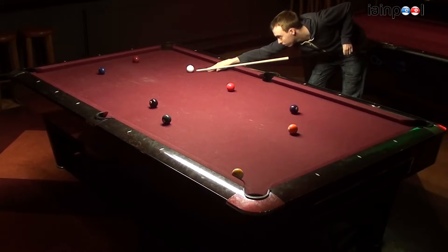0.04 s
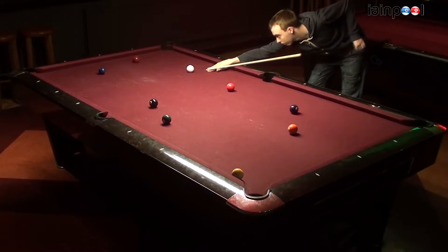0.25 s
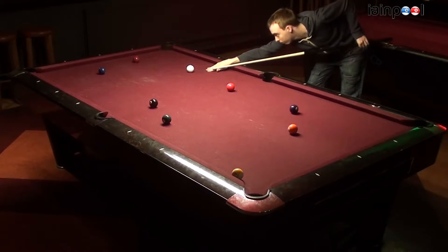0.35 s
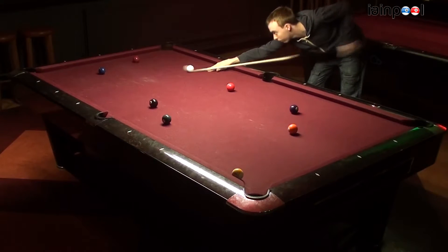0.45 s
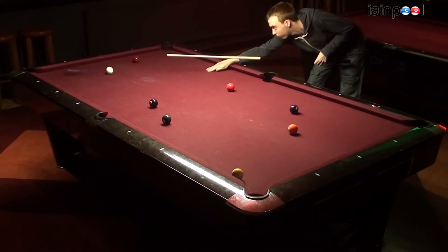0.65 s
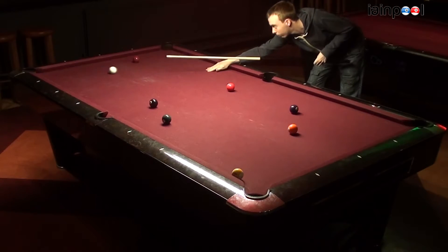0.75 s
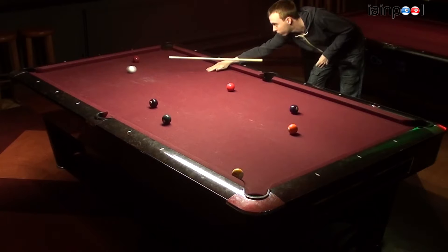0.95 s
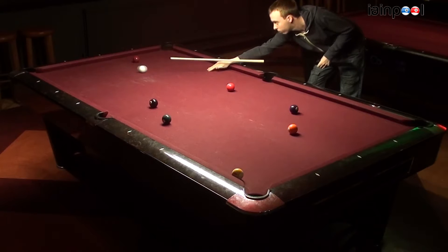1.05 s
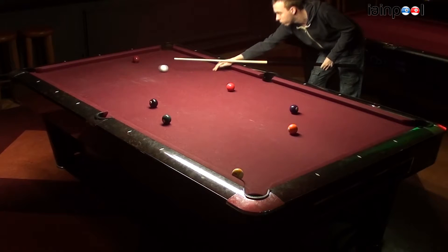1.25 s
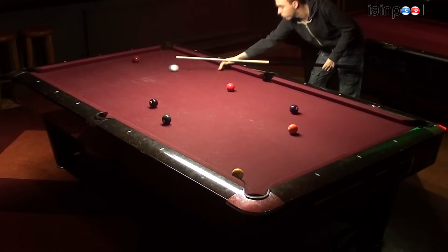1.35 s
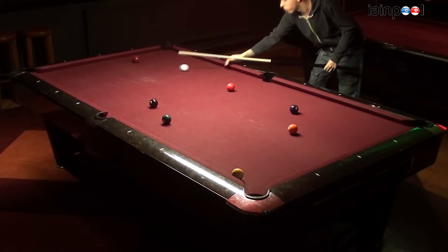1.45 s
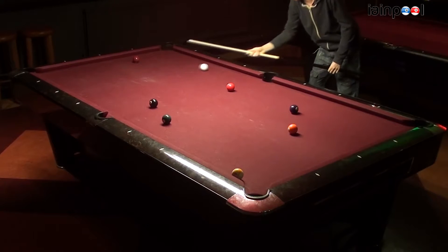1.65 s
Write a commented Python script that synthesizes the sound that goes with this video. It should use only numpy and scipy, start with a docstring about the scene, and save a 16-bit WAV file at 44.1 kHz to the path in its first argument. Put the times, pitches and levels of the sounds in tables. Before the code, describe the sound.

A pool shot in a quiet, hard-walled hall. After a few dull thumps, the cue cracks against the white, two balls click sharply, and one clatters into a pocket and rolls on under the table, heard from a little distance.

```python
"""A quiet, hard-walled hall: one pool shot. A soft knock and dull thumps come first; the cue cracks
against the white, which clicks on an object ball; that ball clatters into a pocket and knocks again
as it rolls on below. Each blow is a coloured click, heard mostly through the room; the table's frame
and the pocket also ring. A fast gain control holds the loud blows down."""
import sys
import numpy as np
from scipy import signal
from scipy.fft import rfft, irfft, next_fast_len
from scipy.io import wavfile
from scipy.ndimage import uniform_filter1d

SR = 44100
rng = np.random.default_rng(int(sys.argv[2]) if len(sys.argv) > 2 else 0)


def put_to_file(sound):
    """Save the sound as 16-bit audio at rate SR, in the file named by the first command-line argument."""
    columns = np.atleast_2d(sound).T  # one column per channel
    safe = np.clip(columns, -1, 1)
    whole_steps = np.round(safe * 32767)
    wavfile.write(sys.argv[1], SR, whole_steps.astype(np.int16))


N = 74970
T = np.arange(N) / SR
FFT_SIZE = next_fast_len(2 * N)
FREQS_HZ = np.maximum(np.arange(FFT_SIZE // 2 + 1) * SR / FFT_SIZE, 1)


def from_db(db):
    """Decibels to gain."""
    return 10 ** (np.asarray(db) / 20)


def unit(x):
    """Scale to unit energy."""
    return x / np.sqrt(np.sum(x ** 2) + 1e-20)


def pan(db):
    """Left and right gains for a left-minus-right level."""
    return from_db(db * np.array([[.5], [-.5]]))


def at_freqs(points):
    """Read (Hz, value) rows on a log-frequency axis."""
    hz, value = np.transpose(points)
    return np.interp(np.log(FREQS_HZ), np.log(hz), value)


def filtered(x, response):
    """Apply a frequency response."""
    return irfft(rfft(x, FFT_SIZE) * response, FFT_SIZE)[..., :N]


def stereo(mid, side, side_db=0):
    """Left and right from a middle and a weaker side, widest in the treble."""
    # Each row: frequency in Hz, side gain in dB before side_db is added.
    width = [(150, -38), (350, -20.5), (700, -14.5), (1500, -12), (4500, -10), (9000, -13.5), (12000, -47)]
    return mid + filtered(side, from_db(at_freqs(width) + side_db)) * np.array([[1], [-1]])


def noise(colour, side_db):
    """Steady coloured stereo noise, rms about 1."""
    white = rfft(rng.standard_normal((2, FFT_SIZE)))
    mid, side = irfft(white * from_db(at_freqs(colour)), FFT_SIZE)[:, :N]
    return stereo(unit(mid), unit(side), side_db) * np.sqrt(N)


def causal_click(colour):
    """Minimum-phase click of a given colour: it rings only after it starts."""
    cepstrum = irfft(np.log(from_db(at_freqs(colour))), FFT_SIZE)
    cepstrum[1:FFT_SIZE // 2] *= 2
    cepstrum[FFT_SIZE // 2 + 1:] = 0
    return unit(irfft(np.exp(rfft(cepstrum)), FFT_SIZE)[:N])


def hall_response():
    """Early reflections plus a diffuse tail that swells and dies band by band, the bass coming late."""
    # Each row: frequency in Hz, T60 in seconds.
    decays = [(80, 0.68), (200, 0.72), (550, 0.61), (1200, 0.55), (2200, 0.39), (7000, 0.37), (15000, 0.3)]
    build_cycles = 1.66
    echoes_per_s, echo_fade_s, echo_db = 770, 0.039, -6
    hz, t60s = np.transpose(decays)
    white = rfft(rng.standard_normal((2, N)))
    log_hz = np.log(np.maximum(np.arange(white.shape[1]) * SR / N, 1))
    tail = 0
    for weights, centre_hz, t60_s in zip(np.eye(len(hz)), hz, t60s):
        band = irfft(white * np.interp(log_hz, np.log(hz), weights), N)
        swell = 1 - np.exp(-T * centre_hz / build_cycles)
        tail = tail + band * swell * from_db(-60 * T / t60_s)
    arrivals = rng.random((2, N)) < echoes_per_s / SR
    echoes = arrivals * rng.choice([-1, 1], (2, N)) * np.exp(-T / echo_fade_s)
    echoes = signal.sosfilt(signal.butter(1, 250, "high", fs=SR, output="sos"), echoes)
    mid, side = [unit(unit(late) + from_db(echo_db) * unit(early)) for late, early in zip(tail, echoes)]
    return stereo(mid, side)


def direct_path(scatter_s=0.0041, scatter_db=2):
    """One arrival plus a short burst scattered by balls and rails."""
    burst = unit(rng.standard_normal(N) * np.exp(-T / scatter_s))
    return unit((T == 0) + from_db(scatter_db) * burst)


def blows(contacts, colour, direct_db, level_db=0):
    """Clicks coloured by the struck body, softened by the contact's cut-off, spread by the hall."""
    # Reflections are duller than direct sound. Each row: frequency in Hz, gain in dB.
    wall_loss = [(3000, -1.5), (8000, -2), (14000, -5)]
    wall_gain = from_db(at_freqs(wall_loss))
    body = causal_click(colour)[:N // 16]
    out = np.zeros((2, N))
    for start_s, strength_db, cutoff_hz in contacts:
        click = unit(signal.sosfilt(signal.butter(2, cutoff_hz, fs=SR, output="sos"), body))
        direct = from_db(direct_db) * rfft(direct_path(), FFT_SIZE)
        reflected = wall_gain * rfft(hall_response(), FFT_SIZE)
        heard = filtered(click, direct + reflected)
        start = int(start_s * SR)
        out[:, start:] += from_db(level_db + strength_db) * heard[:, :N - start]
    return out


def ringing(contacts, modes, level_db):
    """Each blow rings the modes at slightly varied level and pitch; soft contacts miss the high ones."""
    spread_db, detune = 2, 0.0063
    out = np.zeros(N)
    for start_s, strength_db, cutoff_hz in contacts:
        start = int(start_s * SR)
        t = T[:N - start]
        for hz, mode_db, t60_s in modes:
            level_draw, pitch_draw = rng.standard_normal(2)
            onset_db = level_db + strength_db + mode_db + spread_db * level_draw
            swell = 1 - np.exp(-t * hz)  # about one cycle
            contact_gain = 1 / np.hypot(1, (hz / cutoff_hz) ** 2)
            tone = np.sin(2 * np.pi * hz * (1 + detune * pitch_draw) * t)
            out[start:] += contact_gain * swell * from_db(onset_db - 60 * t / t60_s) * tone
    return out


def room_floor(level_db=-44.5):
    """The hall's steady, low background noise."""
    # Each row: frequency in Hz, relative level in dB.
    colour = [(20, -31), (60, 4.5), (150, 1.5), (250, -18), (350, 7.5), (480, -7.5), (650, -8), (1100, -8),
              (2000, -26), (4500, -33), (9000, -35.5)]
    return from_db(level_db) * noise(colour, side_db=2)


def amplifier_hiss(level_db=-56.5):
    """The amplifier's faint, steady hiss."""
    # Each row: frequency in Hz, relative level in dB.
    colour = [(1000, 4), (4500, 5.5), (9000, 1.7), (16000, -3.5)]
    return from_db(level_db) * noise(colour, side_db=4)


def rolling():
    """Balls rumble on the slate and inside the table."""
    # Each row: time in seconds, level in dB.
    levels = [(0, -83), (.18, -48.5), (.45, -46.5), (.57, -26), (.8, -24), (1.0, -29), (1.2, -37),
              (1.45, -44), (1.7, -47)]
    # Each row: frequency in Hz, relative level in dB.
    colour = [(25, -16), (60, -13), (110, 4.5), (200, 4.5), (340, 5), (440, -2), (560, 14), (800, -3),
              (1200, -19.5), (2500, -9), (6000, -82)]
    return from_db(np.interp(T, *np.transpose(levels))) * noise(colour, side_db=-2)


def shaft_slide():
    """The cue hisses over the bridge hand, swelling and fading with each move."""
    # Each row: start in seconds, attack in seconds, decay in seconds, level in dB.
    slides = [(0.375, 0.011, 0.017, -42), (.40, 0.024, 0.29, -48.5), (1.367, 0.025, 0.14, -45.5),
              (1.40, 0.054, 0.12, -52)]
    # Each row: frequency in Hz, relative level in dB.
    colour = [(500, 5.5), (1700, 5.5), (3000, -1.5), (4500, -3), (7000, -2), (10000, -14), (16000, -30)]
    envelope = np.zeros(N)
    for start_s, attack_s, decay_s, level_db in slides:
        rise = np.clip((T - start_s) / attack_s, 0, 1)
        fall = np.exp(-np.maximum(T - start_s - attack_s, 0) / decay_s)
        envelope += from_db(level_db) * rise * fall
    return envelope * noise(colour, side_db=1.5)


def wooden_knocks():
    """Soft knocks on wood, before the stroke and later under the table."""
    # Each row: start in seconds, strength in dB, contact cut-off in Hz.
    knocks = [(0, -15.5, 380), (.405, -8, 1030), (.495, 2, 1070), (.518, 2, 1710), (.536, 1, 1550),
              (1.212, -8.5, 1550), (1.288, -13.5, 1070), (1.355, -11, 1340), (1.412, -19.5, 966)]
    # Each row: frequency in Hz, relative level in dB.
    colour = [(60, 2), (140, -9), (320, 3), (420, -6), (600, 6), (1000, -0.5), (1900, -7), (3000, -15),
              (6000, -74)]
    return blows(knocks, colour, direct_db=-25, level_db=8.5)


def frame_thumps():
    """Dull thumps ring the table's frame, off to the right."""
    # Each row: start in seconds, strength in dB, contact cut-off in Hz.
    thumps = [(.216, -4.5, 930), (.226, -1.5, 1230), (.248, 2, 1900), (.304, -9, 480)]
    # Each row: frequency in Hz, relative level in dB.
    colour = [(30, -35), (70, -30.5), (130, -1.5), (215, -4.5), (370, -4), (460, -12), (660, -16.5),
              (1000, -30), (2000, -40.5), (6000, -50)]
    # Each row: frequency in Hz, relative level in dB, T60 in seconds.
    modes = [(159.7, -2.5, 0.48), (214.5, 6.5, 0.18), (297, -2, 0.19), (353.4, -10, 0.7)]
    impacts = blows(thumps, colour, direct_db=-11, level_db=18)
    return pan(db=-2.5) * (impacts + ringing(thumps, modes, level_db=-16.5))


def rail_slaps():
    """Hard ticks of the ball on rail and pocket rim."""
    # Each row: start in seconds, strength in dB, contact cut-off in Hz.
    slaps = [(.8385, 1, 11200), (.857, 6, 12300), (.937, -1, 12300), (.986, -10, 10000)]
    # Each row: frequency in Hz, relative level in dB.
    colour = [(800, -40), (2500, 4.5), (4000, 3), (5300, -1), (7500, 2.5), (9000, -5.5), (10500, -12),
              (12500, -19), (16000, -18)]
    return blows(slaps, colour, direct_db=-7, level_db=1)


def pocket():
    """The ball knocks into the hollow, ringing pocket, lands with a clack and knocks on below."""
    # Hollow knocks and landing. Each row: start in seconds, strength in dB, contact cut-off in Hz.
    drops = [(.845, -7.5, 623), (.856, 0.5, 2190), (.865, 0, 1280), (.873, -0.5, 1060), (1.228, -20, 2600),
             (1.245, -20.5, 2700), (1.259, -19.5, 2700)]
    clacks = [(.9005, 20.1, 9000)]
    # Their spectra. Each row: frequency in Hz, relative level in dB.
    drop_colour = [(60, -48), (190, -20), (420, -6.5), (780, 3.5), (1030, 2), (1300, -1.5), (1650, -3),
                   (1900, -1), (2400, -13.5), (7000, -46)]
    clack_colour = [(100, -35.5), (350, 4.5), (680, -2.5), (1000, -5), (1350, -2.5), (1650, -7), (2000, 2),
                    (2500, -14), (2850, -7), (4500, -21), (14000, -35)]
    # Each row: frequency in Hz, relative level in dB, T60 in seconds.
    modes = [(513, 5.5, 0.57), (650, 11, 0.23), (751, 17, 0.17), (886, -5, 0.12), (1077, 6.5, 0.085),
             (1550, 9, 0.16), (1924, 4, 0.19), (2130, 9, 0.22)]
    drop_db, ring_db = 19, -48
    tumble = blows(drops, drop_colour, direct_db=-7.5, level_db=drop_db)
    tumble += ringing(drops, modes, drop_db + ring_db)
    landing = blows(clacks, clack_colour, direct_db=-11) + ringing(clacks, modes, ring_db)
    return tumble + landing


def cue_crack():
    """The cue tip hits the white with a bright crack."""
    # Each row: start in seconds, strength in dB, contact cut-off in Hz.
    stroke = [(.5585, 19, 13500)]
    # Each row: frequency in Hz, relative level in dB.
    colour = [(150, -39), (400, -10), (650, -11.5), (920, 2), (1300, -4), (1750, -10.5), (2500, -2.5),
              (3150, -11), (3800, -8), (4800, -15.5), (7300, -9), (9000, -20.5), (12500, -37), (14500, -27),
              (16000, -37)]
    return blows(stroke, colour, direct_db=-11)


def ball_click(echo_delay_s=0.0087):
    """Ball meets ball; the click's treble glances back off a hard surface close by."""
    # Each row: start in seconds, strength in dB, contact cut-off in Hz.
    clicks = [(0.6974, 24.5, 15000)]
    # Spectra of click and echo. Each row: frequency in Hz, relative level in dB.
    click_colour = [(200, -36), (700, -7), (1250, -2), (2100, 5.5), (3000, 2.5), (4300, -11.5), (5900, -34),
                    (7500, -29), (9000, -39), (10500, -30), (12200, -47), (14000, -30), (16000, -52)]
    echo_colour = [(4000, -4), (6300, -9), (7500, 2.5), (9000, -11), (12200, -16), (14000, -8),
                   (16000, -22)]
    echoes = [(start_s + echo_delay_s, db, cutoff_hz) for start_s, db, cutoff_hz in clicks]
    click = blows(clicks, click_colour, direct_db=-5.5)
    return click + blows(echoes, echo_colour, direct_db=-2, level_db=-26.5)


def scene():
    """All sources over the room's noise, the bass leaning right."""
    # Each row: frequency in Hz, left minus right in dB.
    balance = [(600, -1.2), (3000, 0.5)]
    impacts = frame_thumps() + wooden_knocks() + ball_click() + cue_crack() + pocket() + rail_slaps()
    sound = impacts + shaft_slide() + rolling() + room_floor()
    return filtered(sound, pan(at_freqs(balance)))


def record(dry):
    """Fast gain control, keener on treble, ducks loud blows; then hiss, soft clipping and a top cut."""
    threshold_db, reduction_share, release_db_per_s = -6.5, 0.68, 180
    detect_s, treble_hz, treble_db = 0.002, 2680, 9.5
    ceiling, cutoff_hz = 1.5, 15900
    window = int(detect_s * SR)
    treble = signal.sosfilt(signal.butter(1, treble_hz, "high", fs=SR, output="sos"), dry)
    sensed = dry + from_db(treble_db) * treble
    power = uniform_filter1d(np.mean(sensed ** 2, axis=0), window)
    level_db = 10 * np.log10(np.maximum(power, 1e-12))
    reduction_db = reduction_share * np.maximum(level_db - threshold_db, 0)
    release_db = release_db_per_s * T
    held_db = np.maximum.accumulate(reduction_db + release_db) - release_db
    ducked = dry * from_db(-uniform_filter1d(held_db, window))
    clipped = ceiling * np.tanh((ducked + amplifier_hiss()) / ceiling)
    return signal.sosfilt(signal.ellip(10, .1, 80, cutoff_hz, fs=SR, output="sos"), clipped)


dry = scene()
out = record(dry)
put_to_file(out)
```